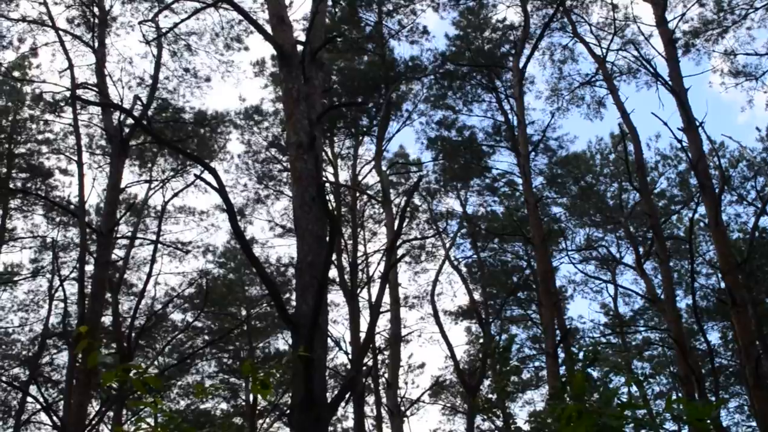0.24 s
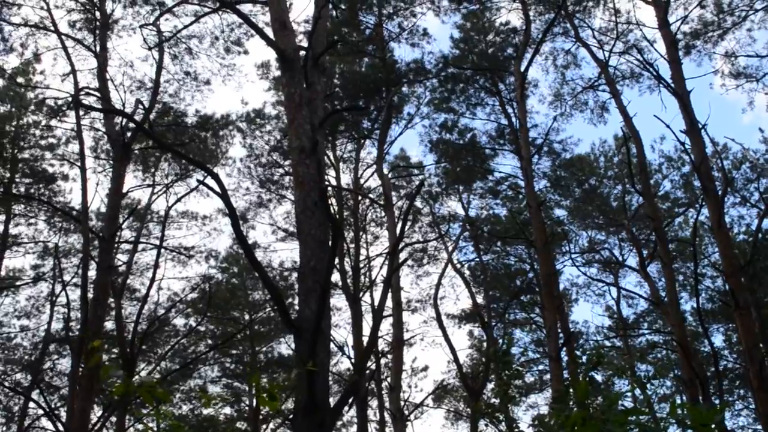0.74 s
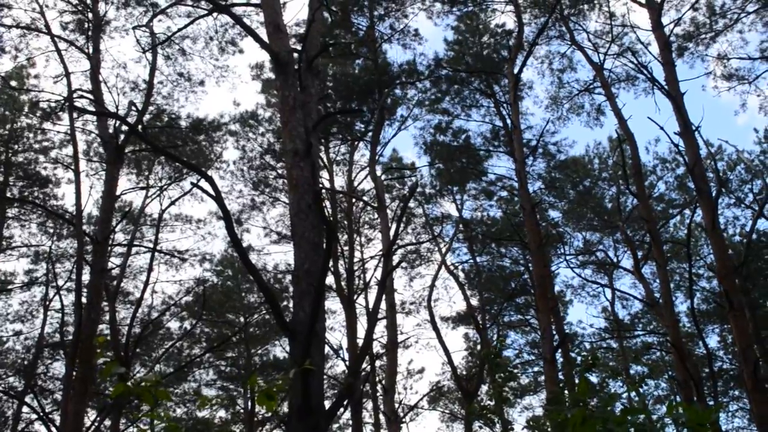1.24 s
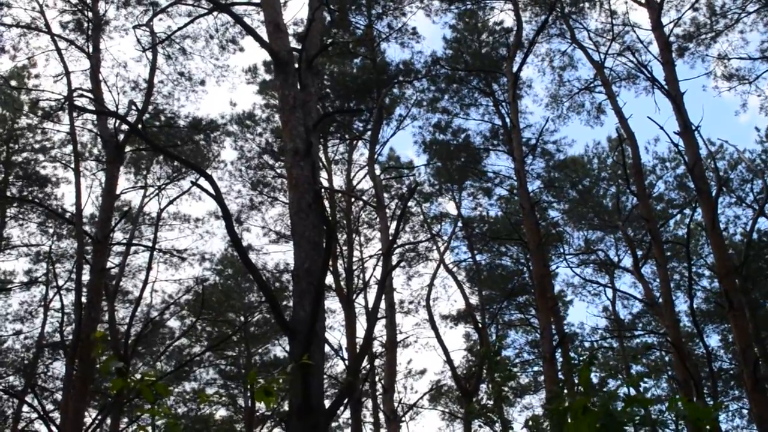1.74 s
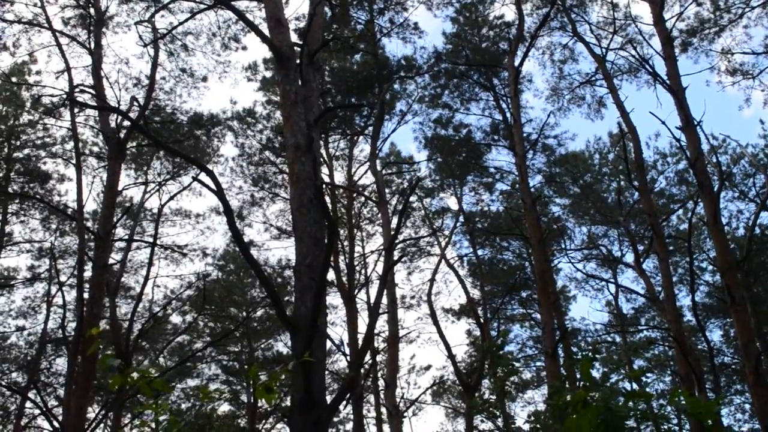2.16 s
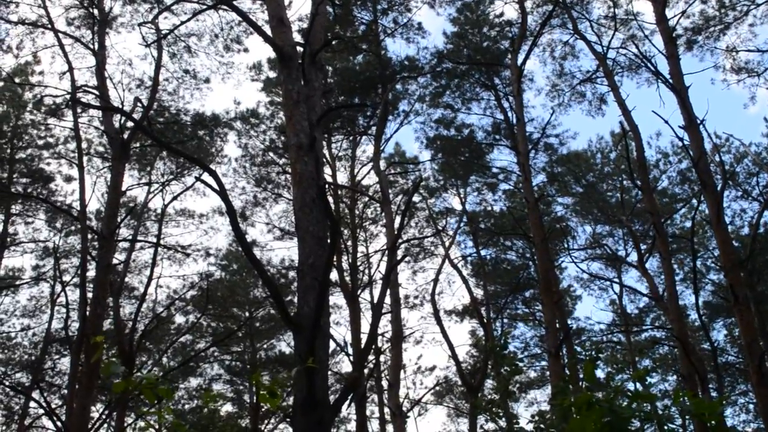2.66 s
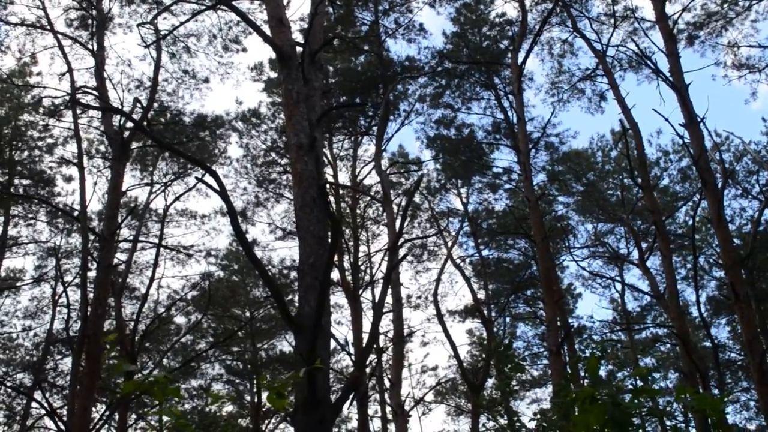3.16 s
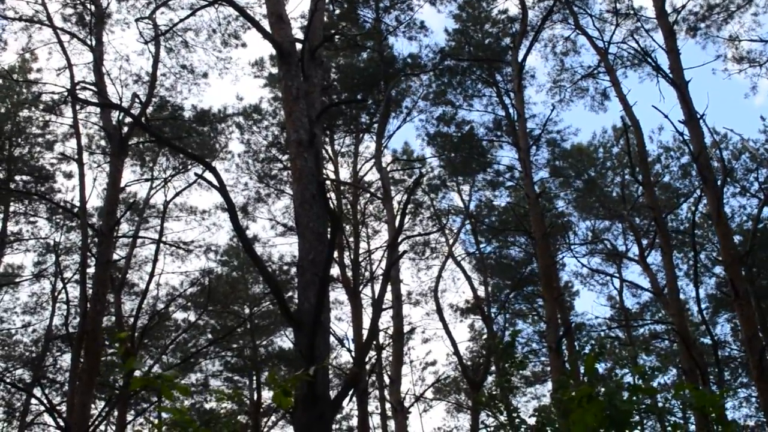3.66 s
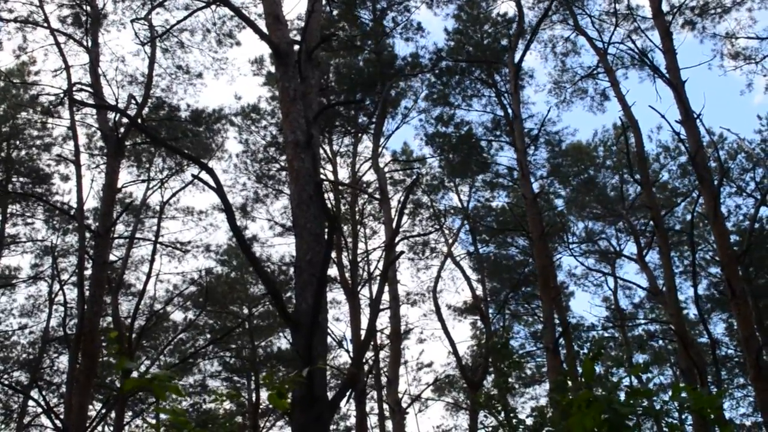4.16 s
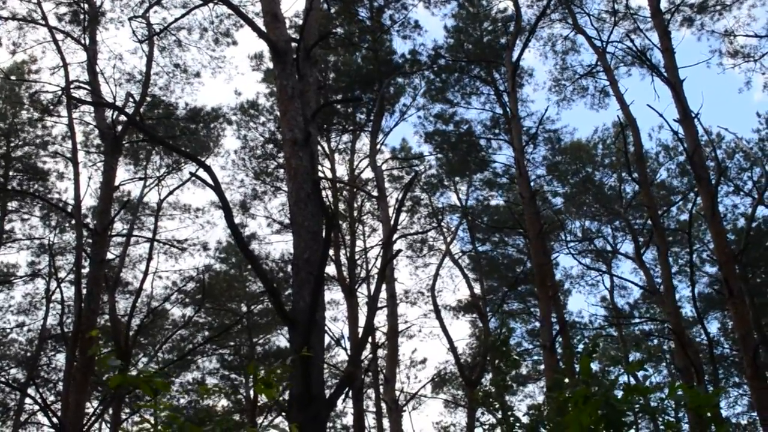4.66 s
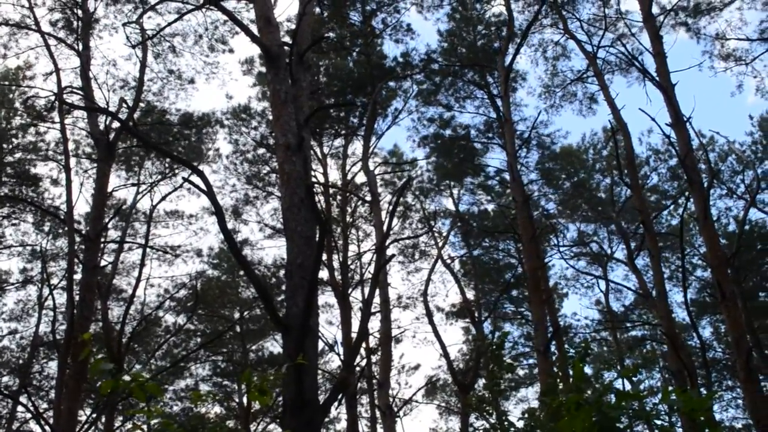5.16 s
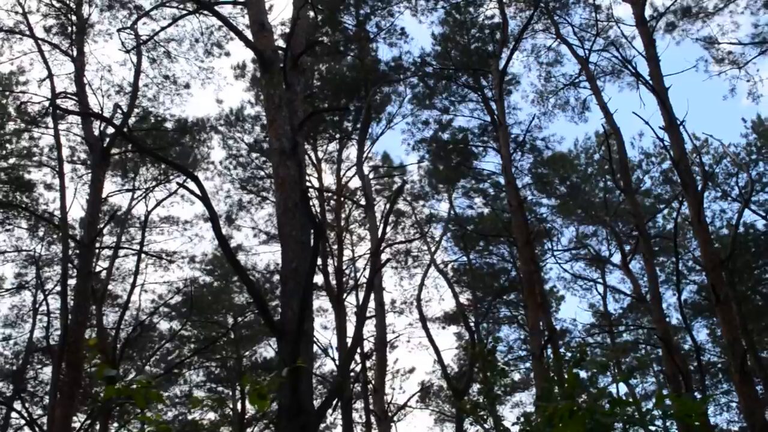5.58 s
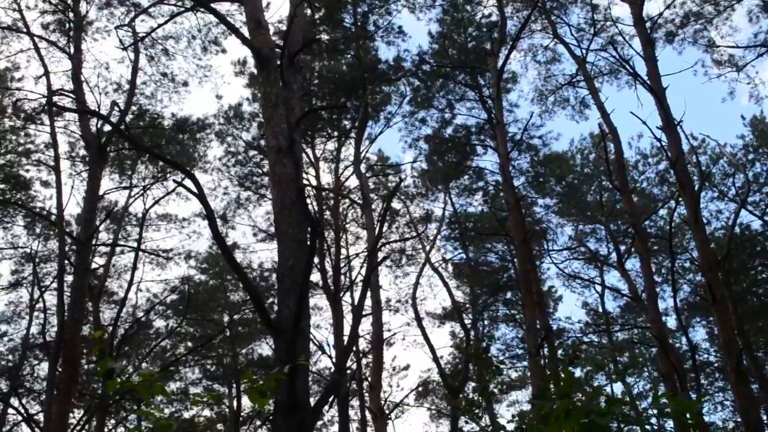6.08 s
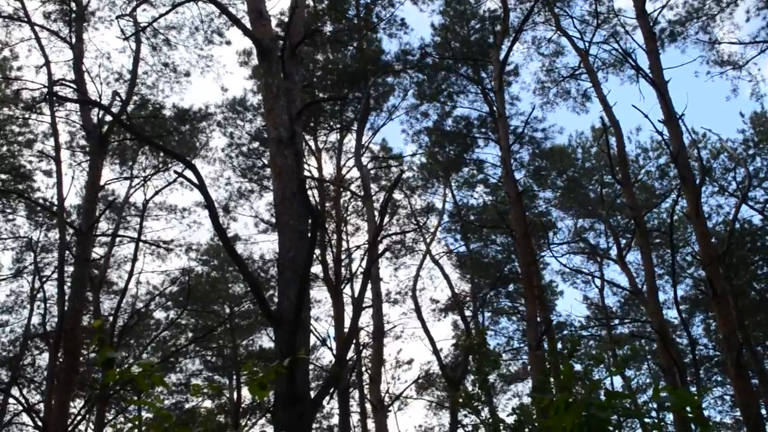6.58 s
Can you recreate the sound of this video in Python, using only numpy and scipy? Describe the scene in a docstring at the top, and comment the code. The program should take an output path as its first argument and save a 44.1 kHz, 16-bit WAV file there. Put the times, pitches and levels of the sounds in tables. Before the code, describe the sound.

A light breeze hushes steadily in the crowns of a pine forest, with distant birds barely audible. About halfway through, a small songbird nearby starts a series of high, upward-sweeping notes that grow louder and speed up into a shivering trill. A twig ticks faintly as the trill begins. Near the end a thrush whistles a few lower notes farther off, softly echoing among the trees.

```python
"""First a light breeze hushes in the crowns of a pine forest, with far birds barely heard.
Then a small songbird sings spaced, rising 'tsip' notes that speed up into a shivering trill.
Each note is a whistle that sweeps upward, shaped by the bird's throat and beak; branches and trunks
scatter it into a short tail. A twig gives one quick double tick as the trill begins, and
near the end a thrush whistles farther off."""
import sys
import numpy as np
from scipy import signal
from scipy.fft import rfft, irfft
from scipy.io import wavfile
from scipy.ndimage import uniform_filter1d, map_coordinates

SR = 44100
rng = np.random.default_rng(int(sys.argv[2]) if len(sys.argv) > 2 else 0)


def wav_out(sig):
    """Save sig, one row per channel (or a flat mono array), as 16-bit PCM at SR to the path in sys.argv[1]."""
    wavfile.write(sys.argv[1], SR, np.round(np.clip(np.atleast_2d(sig).T, -1, 1) * 32767).astype(np.int16))


N = 301203
TIME = np.arange(N) / SR


def songbird(trill_from_s=4.935, changeover_s=.06, flick_db=-52):
    """The near bird: slow notes turn into the trill as it hurries."""
    out = np.zeros(N)
    for s, rise, lead, top_hz, db in opening_notes() + trill_notes():
        haste = 1 / (1 + np.exp((trill_from_s - s) / changeover_s))   # 0 = tsip, 1 = trill
        offset, note = rising_note(rise, top_hz, haste, lead)
        add(out, s + offset, from_db(db) * note)
        add(out, s + rise + 0.0024, from_db(flick_db) * (1 - haste) ** 6 * flick(top_hz))
    return out


# The spaced notes. A note has a lead-in, a bend called the knee, then a rise to its top.
# Each row: time of the knee in seconds, length of the rise in seconds, relative level in dB.
SPACED_NOTES = [(3.4336, .029, -37.5), (3.625, .027, -36.5), (3.7872, 0.026, -32.5), (3.941, .023, -28),
                (4.0896, .029, -27), (4.234, .032, -28), (4.3756, 0.03, -26.5), (4.506, .033, -27.5),
                (4.6388, .029, -24), (4.7712, 0.029, -22.5), (4.8858, .024, -24.5), (4.9623, 0.021, -26)]
def opening_notes(first_top_hz=9200, settled_top_hz=7440, settle_s=.49, lead_share=.48):
    """List the spaced notes: each tops out at a lower pitch than the last."""
    s, rise, db = np.transpose(SPACED_NOTES)
    top_hz = settled_top_hz + (first_top_hz - settled_top_hz) * np.exp((s[0] - s) / settle_s)
    return list(zip(s, rise, lead_share * rise, top_hz, db))


# How the trill flags halfway and picks up again.
# Each row: time in seconds, relative level in dB, top pitch in Hz, length of the rise in seconds.
TRILL_COURSE = [(5.02, -25, 7510, 0.02), (5.2, -24.5, 7340, .0225), (5.39, -25, 7520, 0.022),
                (5.636, -26, 7110, 0.022), (5.70, -24.5, 7240, 0.022), (5.95, -24.5, 7310, 0.017),
                (6.08, -22.5, 7310, .0162), (6.21, -25.5, 7140, .015), (6.335, -25.2, 7060, .018)]
def trill_notes(start_s=5.0248, count=22, gap_s=.06026, gap_growth_s=.000213, spread_hz=30):
    """List the trill's notes: it slows and sinks slightly as it runs."""
    k = np.arange(count)
    s = start_s + k * gap_s + gap_growth_s * k * (k - 1) / 2
    lead = .0095 + .00035 * k   # seconds: each lead-in is a little longer
    when, *columns = np.transpose(TRILL_COURSE)
    db, top_hz, rise = [np.interp(s, when, column) for column in columns]
    return list(zip(s, rise, lead, top_hz + spread_hz * rng.standard_normal(count), db))


# The shapes of a tsip and of a trill note. Each row: place in the note (below 0 is the lead-in,
# 0 the knee, 1 the top), pitch in Hz before stretching, relative level in dB.
TSIP_SHAPE = [(-1.2, 1740, -16.5), (-0.78, 2650, -15.5), (-0.42, 3700, -14), (-0.11, 4600, -13.5),
              (0.064, 5790, -8.5), (0.21, 6480, -8), (0.5, 7130, -2), (0.76, 7400, -3), (0.99, 7980, -6.5),
              (1.13, 7650, -9), (1.6, 6900, -28)]
TRILL_SHAPE = [(-1, 3460, -30), (-0.7, 3920, -16), (-0.51, 4070, -11.5), (-0.11, 4600, -6),
               (0.068, 5265, -1), (0.28, 5770, -3), (0.54, 6400, -2), (0.81, 7170, -2), (0.96, 7400, -5.5),
               (1.16, 7050, -7.5), (1.6, 5800, -29.5)]
# Overtones of the bird's voice box, at two and three times the pitch. Each entry: relative level in dB.
OVERTONES_DB = [-3, -18.5]
# How the throat and beak colour the voice. Each row: frequency in Hz, boost or cut in dB.
THROAT = [(2000, -25.5), (2800, -12.5), (3800, -4.5), (5000, 0), (7400, 1.5), (9000, 4), (11000, -14.5)]
def rising_note(rise, top_hz, haste, lead, jitter=0.0058, flutter_db=1.0,
                overtone_fade_hz=7650, trill_overtone_db=-17.5):
    """A whistle that shoots up and hooks over; returns its start, counted from the knee, and its sound."""
    shape = (1 - haste) * np.array(TSIP_SHAPE) + haste * np.array(TRILL_SHAPE)
    places, pitches, levels = shape.T
    times = places * np.where(places < 0, lead, rise)
    t = np.arange(times[0], times[-1], 1 / SR)
    hz = uniform_filter1d(np.interp(t, times, pitches), size=80)
    # above the knee the sweep is stretched to reach this note's top
    climb = np.clip(t / rise, 0, 1)
    hz = hz * (top_hz / hz.max()) ** np.sqrt(climb)
    # no two sweeps take quite the same path, but the top is held steady
    hz = hz * (1 + jitter * (2 - 2.1 * climb) * wander(t, 296))
    phase = 2 * np.pi * np.cumsum(hz) / SR
    tone = gain_at(THROAT, hz) * np.sin(phase)
    for k, db in enumerate(OVERTONES_DB, 2):
        # overtones sound only while they lie low enough for the throat, and less in the trill
        passed = gain_at(THROAT, k * hz) / (1 + (k * hz / overtone_fade_hz) ** 4) * (k * hz < SR / 2)
        tone = tone + from_db(db + haste * trill_overtone_db) * passed * np.sin(k * phase)
    loudness = from_db(np.interp(t, times, levels) + flutter_db * wander(t, 296))
    return t[0], tone * loudness * soft_ends(t, 0.00079)


def flick(top_hz, above_hz=1700, fall=0.15, length_s=0.0062):
    """A faint falling second voice, above the top of each slow note."""
    t = np.arange(0, length_s, 1 / SR)
    hz = (top_hz + above_hz) * (1 - fall * (t / length_s) ** 2)
    return gain_at(THROAT, hz) * np.sin(2 * np.pi * np.cumsum(hz) / SR) * soft_ends(t, 0.0013)


# The tone of the song thrown sideways into the trees. Each row: frequency in Hz, boost in dB.
SIDEWAYS = [(3000, 4), (4200, 6), (5400, 3), (7000, 2.5), (8000, 3), (9500, 7.5), (11000, 3.5)]
def among_trees(song, branches_db=-14, trunks_db=-14):
    """The song arrives directly, then scattered by branches and, a little later, by trunks."""
    thrown = coloured(song, SIDEWAYS)
    branches = from_db(branches_db) * scatter(thrown, first_s=0.00071, ring_s=0.11)
    trunks = from_db(trunks_db) * scatter(thrown, first_s=0.011, ring_s=0.41)
    return song + branches + trunks


# The thrush's notes. Each row: start and length in seconds, first, middle and last pitch in Hz,
# level in dB, swell from start to end in dB, depth of the warble in Hz.
THRUSH_NOTES = [(5.705, 0.048, 1780, 1983, 1890, -50.5, 6, 3), (5.768, 0.047, 2550, 2610, 2460, -55, 9, 5),
                (5.808, .125, 2076, 2000, 2070, -50, 5, 165), (6.032, 0.036, 2450, 2270, 2000, -50, 1, 6),
                (6.072, 0.055, 1560, 1780, 1880, -53, -3, 0),
                (6.115, 0.1, 1787, 1929, 1926, -44.5, 11, -18), (6.41, 0.104, 2660, 2467, 2412, -50, 2, -2),
                (6.51, 0.12, 2403, 2287, 2284, -45, -13, -6), (6.625, 0.044, 2280, 1950, 1556, -50, -5, -2)]
def thrush(echo_db=-6):
    """A thrush whistles farther off, so more of its sound arrives scattered by the trees."""
    direct = whistles(THRUSH_NOTES, waver=0.0056, fade_s=0.011)
    return direct + from_db(echo_db) * scatter(direct, first_s=0.018, ring_s=0.68)


def whistles(rows, waver, fade_s, warbles_per_s=73.7, slip_radians=.7):
    """Fluted notes: each bends through three pitches, and some warble quickly."""
    out = np.zeros(N)
    for s, length, start_hz, middle_hz, end_hz, db, swell_db, depth_hz in rows:
        t = np.arange(0, length, 1 / SR)
        progress = t / length
        bend = np.polyfit([0, .5, 1], [start_hz, middle_hz, end_hz], 2)
        hz = np.polyval(bend, progress) * (1 + waver * wander(t, 120))
        hz += depth_hz * np.sin(2 * np.pi * warbles_per_s * t + slip_radians * wander(t, 70))
        loudness = from_db(db + swell_db * (progress - .5)) * soft_ends(t, fade_s)
        add(out, s, loudness * np.sin(2 * np.pi * np.cumsum(hz) / SR))
    return out


# The two halves of the twig's tick. Each row: start in seconds, level in dB.
TWIG_TICKS = [(5.0361, -41.5), (5.0385, -44.5)]
# The twig's ringing tones. Each row: pitch in Hz, relative level in dB, seconds to fade by 60 dB.
TWIG_TONES = [(1420, 0, 0.027), (2050, -3, 0.0089), (3100, 0, 0.01)]
def twig():
    """A dry double tick sets the wood ringing very briefly."""
    out, t = np.zeros(N), np.arange(SR // 10) / SR
    ring = sum(from_db(db - 60 * t / ring_s) * np.sin(2 * np.pi * hz * t) for hz, db, ring_s in TWIG_TONES)
    for s, db in TWIG_TICKS:
        add(out, s, from_db(db) * ring)
    return out


# A low warbler's notes. Each row: start and length in seconds, pitch in Hz,
# glide over the note in Hz, relative level in dB, depth of the warble in Hz.
WARBLER_NOTES = [(1.66, 0.081, 1739, 88, -62, 0), (1.82, 0.16, 1940, -120, -61.5, 92),
                 (2.097, 0.079, 2144, -100, -61.5, 60), (2.229, 0.091, 2100, 50, -63, 45),
                 (3.659, 0.088, 2112, 99, -64, 70), (3.771, 0.23, 2283, -41.5, -64.5, 100),
                 (4.08, .07, 1815, 29.5, -57, -2), (4.16, .21, 2112, -51.5, -63, 167),
                 (4.52, 0.16, 2493, 60, -58.5, 49), (4.658, 0.14, 2280, 147, -60.5, 92.5),
                 (6.61, 0.089, 2570, -650, -60, 120)]
# Another bird's thin, even peeps. Each row: start in seconds, pitch in Hz, relative level in dB.
PEEPS = [(1.05, 4140, -62.5), (1.27, 4290, -69), (1.83, 4250, -68), (2.92, 4200, -68), (3.23, 4460, -67.5)]
def far_birds(peep_s=.07, twitter_at_s=6.569, slur_gap_s=.0725, slur_s=0.023, slur_hz=(5540, 4780, 4180),
              slur_db=-64.5, direct_db=-4, echo_db=-4):
    """Three birds deep in the wood, half lost in echo: a warbler, peeps and a falling twitter."""
    warbles = [(s, length, hz - glide_hz / 2, hz, hz + glide_hz / 2, db, 0, depth_hz)
               for s, length, hz, glide_hz, db, depth_hz in WARBLER_NOTES]
    peeps = [(s, peep_s, hz, hz, hz, db, 0, 0) for s, hz, db in PEEPS]
    twitter = [(twitter_at_s + k * slur_gap_s, slur_s, *slur_hz, slur_db, 0, 0) for k in range(4)]
    calls = whistles(warbles, waver=0.0095, fade_s=.013)
    calls += whistles(peeps, waver=.006, fade_s=0.012)
    calls += whistles(twitter, waver=.008, fade_s=0.0046)
    return from_db(direct_db) * calls + from_db(echo_db) * scatter(calls, first_s=.01, ring_s=.8)


# The strength of the breeze. Each row: time in seconds, level of the low hush in dB.
BREEZE_COURSE = [(0, -62), (1.2, -61.5), (3.2, -60.5), (5.0, -60.5), (6.83, -60)]
# The tone of the crowns' hush, and of the wood's high hiss with its faint ring.
# Each row: frequency in Hz, relative level in dB.
HUSH_COLOUR = [(15, -59.5), (25, -29.5), (55, -14.5), (161, -12.5), (312, -4), (405, -2), (569, 0.5),
               (695, -0.5), (849, -0.5), (939, -1.5), (1270, -3.5), (1550, -7), (2050, -10), (2310, -12.5),
               (3000, -13.5), (3900, -40), (6600, -120)]
HISS_COLOUR = [(2000, -13), (2900, -1.5), (3500, 0), (3800, -2), (4150, -3), (4350, 3), (4540, -4),
               (4750, -2.5), (4920, -7.5), (7200, -13), (8000, -18), (8800, -15), (9800, -16.5),
               (11000, -29)]
def breeze(split_hz=1000, top_hz=3000, needles_db=-65, needles_follow=2.3, hiss_db=-69.5, hiss_follow=.45,
           gust_at_s=3.3, gust_s=1.2, gust_db=1.7):
    """Air in the crowns: the needles' brighter share grows with the wind, and the high hiss with it."""
    wind_db = np.interp(TIME, *np.transpose(BREEZE_COURSE))
    gust = np.exp(-((TIME - gust_at_s) / gust_s) ** 2)   # one slow gust brightens the needles
    stir_db = needles_follow * (wind_db - wind_db.mean()) + gust_db * gust
    air = signal.sosfilt(signal.butter(4, top_hz, fs=SR, output="sos"), noise(HUSH_COLOUR))
    low = signal.sosfiltfilt(signal.butter(2, split_hz, fs=SR, output="sos"), air)
    hush = rms_one(low) * from_db(wind_db)
    needles = rms_one(air - low) * from_db(needles_db + stir_db)
    hiss = noise(HISS_COLOUR) * from_db(hiss_db + hiss_follow * stir_db)
    return hush + needles + hiss


def scatter(x, first_s, ring_s):
    """Countless small echoes off wood and foliage begin at first_s and fade by 60 dB in ring_s."""
    t = np.arange(int(1.5 * SR)) / SR
    echoes = rng.standard_normal(len(t)) * (t > first_s) * from_db(-60 * t / ring_s)
    return signal.fftconvolve(x, echoes / np.sqrt(np.sum(echoes ** 2)))[:N]


def from_db(db):
    """Turn decibels into a number to multiply by."""
    return 10 ** (np.asarray(db) / 20)


def rms_one(x):
    """Scale a sound so its average strength (rms) is 1."""
    return x / np.sqrt(np.mean(x ** 2) + 1e-20)


def gain_at(points, hz):
    """Read the gain at any frequency from rows of Hz and dB."""
    freqs, db = np.transpose(points)
    return from_db(np.interp(np.log(np.maximum(hz, 1)), np.log(freqs), db))


def coloured(x, spectrum):
    """Change a sound's tone using rows of Hz and dB."""
    return irfft(rfft(x) * gain_at(spectrum, np.fft.rfftfreq(N, 1 / SR)), N)


def noise(spectrum):
    """Noise with the given tone, at strength 1."""
    return rms_one(coloured(rng.standard_normal(N), spectrum))


def add(out, start, sound):
    """Mix a sound in at a time in seconds."""
    i = round(start * SR)
    out[i:i + len(sound)] += sound[:N - i]


def wander(t, per_s):
    """A smooth random wobble, about 1 in size, through per_s new values a second."""
    knots = rng.standard_normal(int((t[-1] - t[0]) * per_s) + 3)
    return map_coordinates(knots, [(t - t[0]) * per_s], order=3, mode="nearest")


def soft_ends(t, fade_s):
    """Fade a note smoothly in and out."""
    from_edge = np.minimum(t - t[0], t[-1] - t)
    return np.sin(np.pi / 2 * np.clip(from_edge / fade_s, 0, 1)) ** 2


def scene():
    """The birds, the twig and the breeze together in one channel."""
    return (among_trees(songbird()) + thrush() + far_birds() + twig() + breeze())[None, :]


def record(dry, cutoff_hz=10900):
    """The highest treble is cut steeply."""
    return signal.sosfilt(signal.cheby1(12, .1, cutoff_hz, fs=SR, output="sos"), dry)


dry = scene()
out = record(dry)
wav_out(out)
```